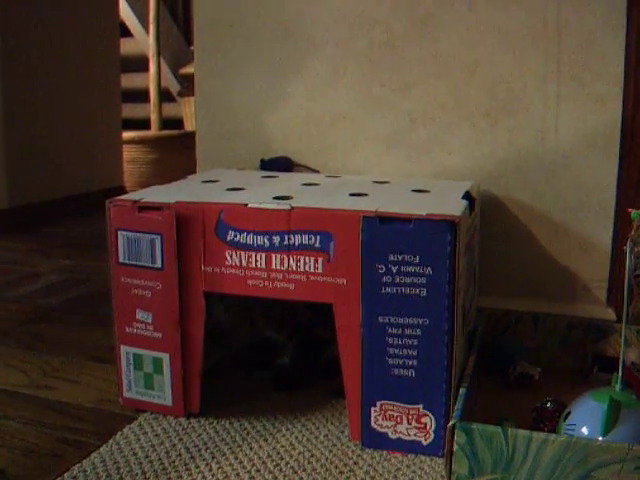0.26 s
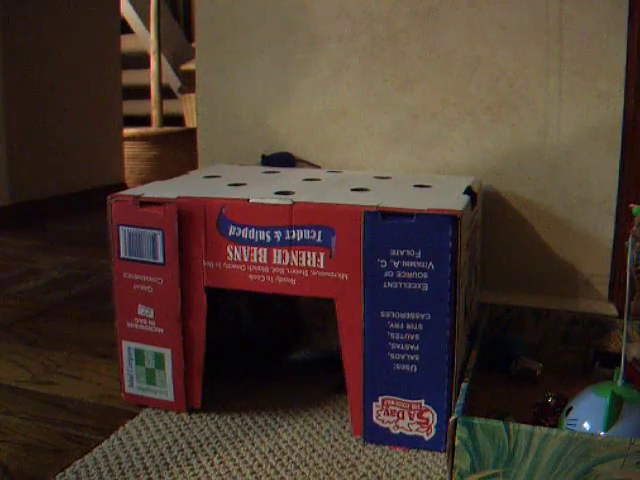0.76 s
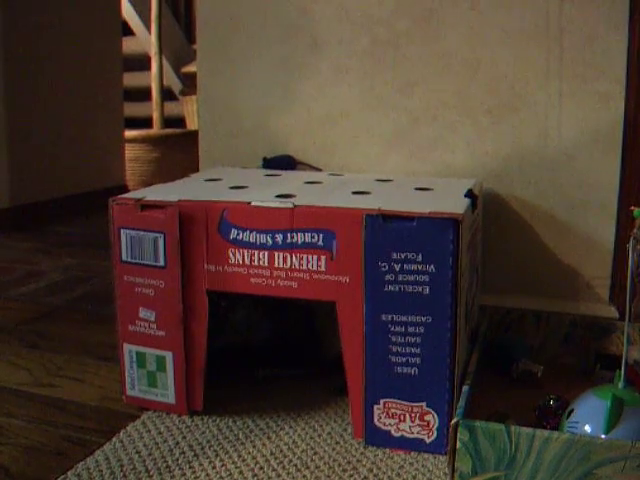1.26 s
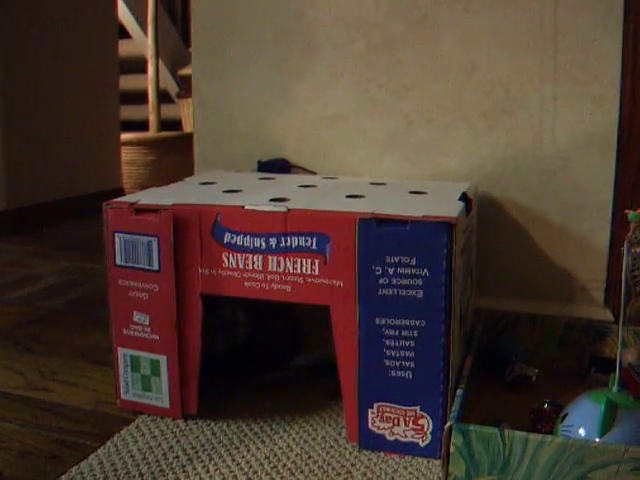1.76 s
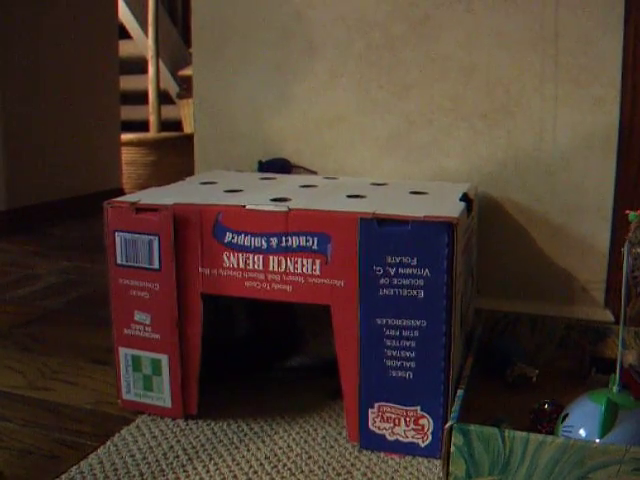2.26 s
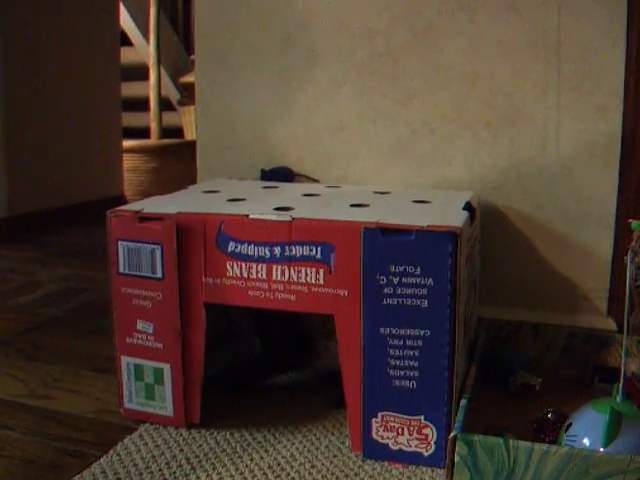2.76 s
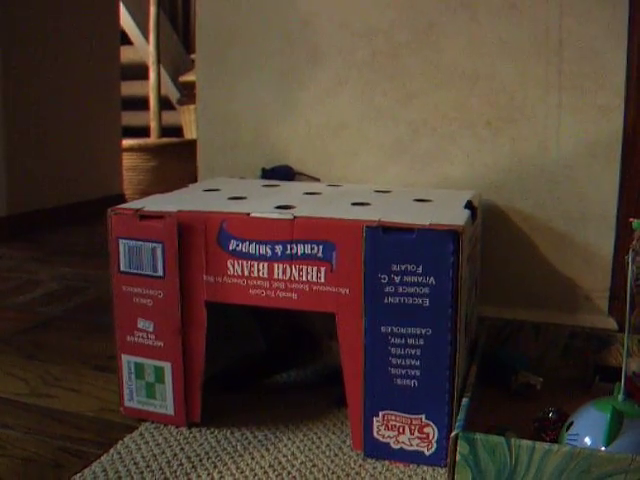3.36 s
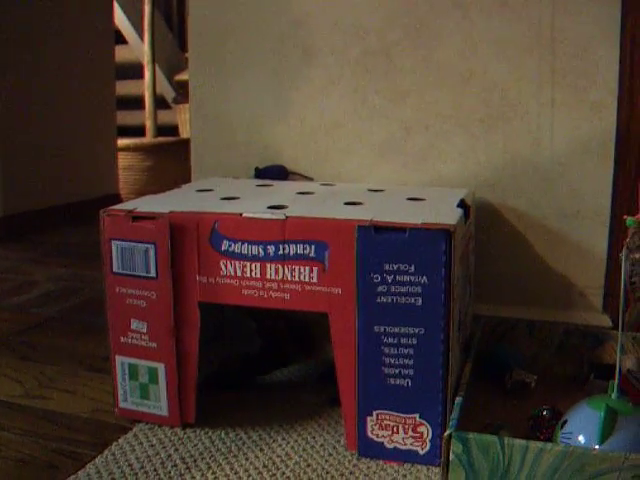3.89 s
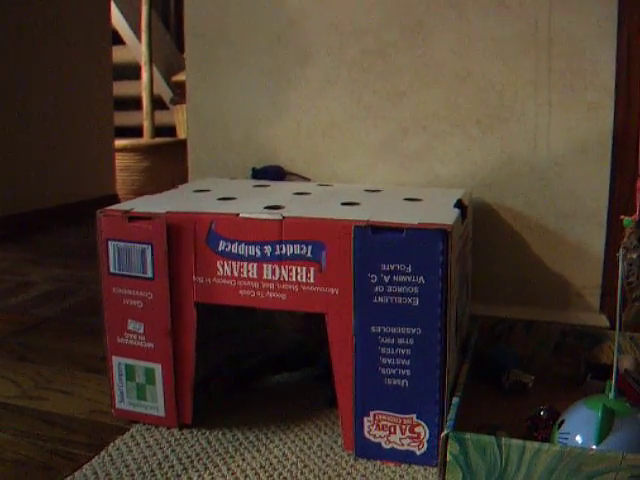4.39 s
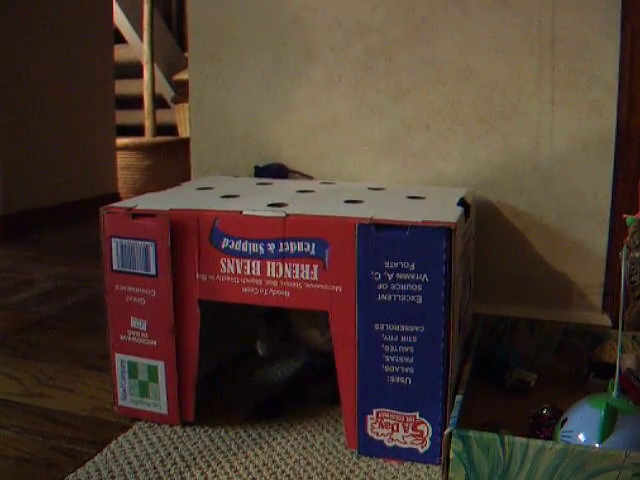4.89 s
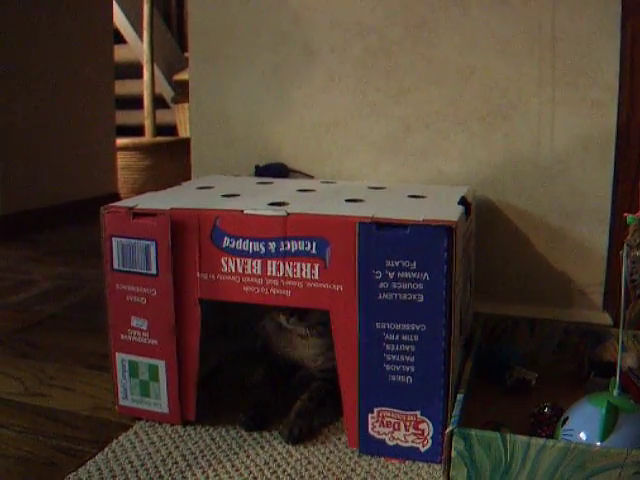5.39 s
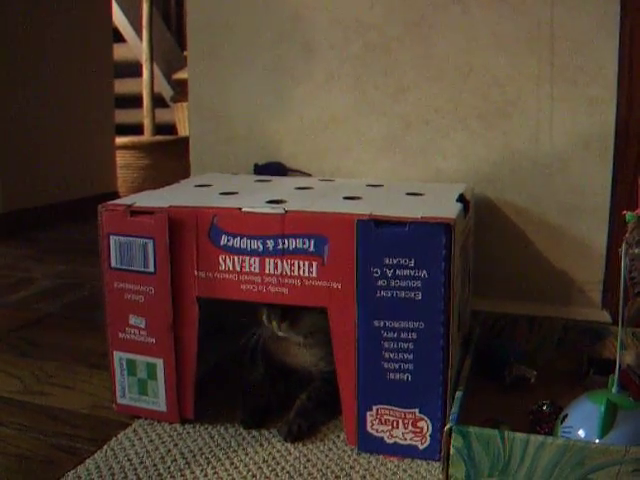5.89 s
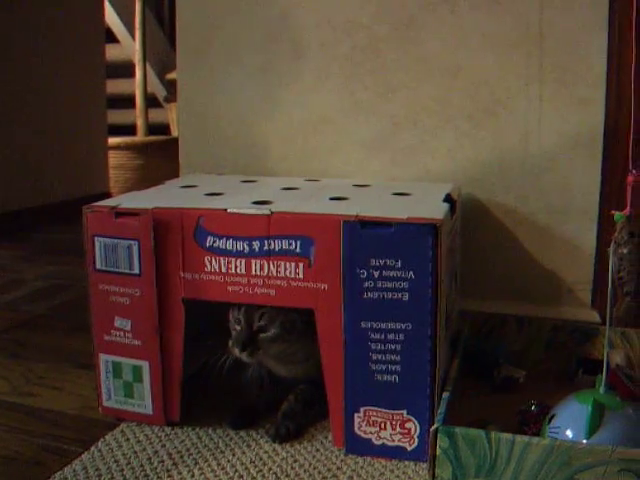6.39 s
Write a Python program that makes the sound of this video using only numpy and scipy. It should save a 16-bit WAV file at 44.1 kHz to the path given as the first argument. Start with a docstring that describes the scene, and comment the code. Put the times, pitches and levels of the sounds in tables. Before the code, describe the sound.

A cat lightly taps and scratches inside a cardboard box, then one sharp click and a few soft paw thumps, over faint hiss.

```python
"""On the floor of a quiet room, a cat shifts about inside a cardboard box.
Its fur brushes the doorway, its claws tap and scrape the card and make it ring,
and its paws thump softly. One sharp click sounds close to the microphone.
Under it all the room rumbles, and the camera hums, hisses and whines faintly."""
import sys
import numpy as np
from scipy import signal
from scipy.fft import rfft, irfft
from scipy.io import wavfile
from scipy.ndimage import map_coordinates

SR = 44100
rng = np.random.default_rng(int(sys.argv[2]) if len(sys.argv) > 2 else 0)


def to_wav(s):
    """Save 16-bit WAV."""
    ch = np.atleast_2d(s).T  # columns
    pcm = np.round(np.clip(ch, -1, 1) * 32767)  # PCM
    wavfile.write(sys.argv[1], SR, pcm.astype(np.int16))


N = 292868
SCENE_TIME = np.arange(N) / SR
T = np.arange(SR // 4) / SR  # seconds within one touch


def amp(db):
    """Turn decibels into a gain."""
    return 10 ** (np.asarray(db) / 20)


def along(points, hz):
    """Read between (frequency, value) points, spaced by pitch."""
    f, v = np.transpose(points)
    return np.interp(np.log(hz + 1), np.log(f + 1), v)


def wobble(rate):
    """A smooth curve through `rate` random points a second."""
    points = rng.standard_normal(int(N * rate / SR) + 4)
    return map_coordinates(points, [SCENE_TIME * rate])


def noise(spectrum):
    """Noise with the given tone colour and an average (rms) size of 1."""
    gain = amp(along(spectrum, np.fft.rfftfreq(N, 1 / SR)))
    x = irfft(rfft(rng.standard_normal(N)) * gain, N)
    return x / np.sqrt(np.mean(x ** 2) + 1e-20)


def add(track, s, sound):
    """Mix a sound in at s seconds."""
    part = track[round(s * SR):][:len(sound)]
    part += sound[:len(part)]


def ring(tones, scatter_db=0):
    """A struck thing rings with several tones; each drops 60 dB in its fade time."""
    return sum(amp(db + scatter_db * rng.standard_normal() - 60 * T / fade) * np.sin(2 * np.pi * hz * T)
               for hz, db, fade in tones)


# tone colours of the rumble and the hiss: f/Hz, relative level/dB
ROOM_RUMBLE = [(5, -21.5), (25, 0.5), (40, -4), (55, -5), (80, 2), (110, -4), (170, -8.5), (260, -5.5),
               (350, -9.5), (450, -7), (600, -8), (850, -10.5), (1300, -23), (2200, -45.5)]
MIC_HISS = [(500, -23), (900, 0.5), (1100, 2), (2000, 1.5), (3500, 0), (6000, 0.5), (7700, 1.5),
            (8300, -8.5), (9000, -22.5)]
# the camera's low tones: f/Hz, level/dB
HUM_TONES = [(120, -68.5), (198, -65.5), (247.3, -60.2), (325, -69)]

def background():
    """The room rumbles, the microphone hisses and the camera hums a little unsteadily."""
    hum = sum(amp(db) * np.sqrt(2) * np.sin(2 * np.pi * hz * SCENE_TIME + .5 * wobble(9.7))
              for hz, db in HUM_TONES)
    return amp(-54) * noise(ROOM_RUMBLE) + amp(-55.5) * noise(MIC_HISS) + hum


# the camera's high tones: f/Hz, level/dB
WHINE_TONES = [(7691.5, -60), (8308, -69.5)]

def whine(frame_hz=29.3035):
    """The camera's electronics sing high tones that start afresh with every frame."""
    frame = SCENE_TIME * frame_hz % 1  # runs from 0 to 1 in each frame
    gate = np.minimum(1, 20 * np.minimum(frame, 1 - frame))
    return gate * sum(amp(db) * np.sqrt(2) * np.sin(2 * np.pi * hz * frame / frame_hz)
                      for hz, db in WHINE_TONES)


# tone colour of fur on card: f/Hz, relative level/dB
FUR_COLOUR = [(60, -3), (150, 2.5), (300, 3.5), (650, 5.5), (1100, -4), (3000, -6), (5500, -2.5),
              (7500, -1), (9000, -25.5)]
# swishes at their firmest touch: t/s, level/dB, swell time/s
FUR_SWISHES = [(.05, -53, .2), (6.02, -52.5, .1), (6.12, -40.5, 0.025), (6.196, -41.5, 0.013),
               (6.31, -53.5, .07)]

def fur(swell_db=10.5):
    """The coat brushes the card in uneven swishes that rise, then fall, by swell_db per swell time."""
    touch = sum(amp(db - swell_db * np.abs(SCENE_TIME - s) / swell) for s, db, swell in FUR_SWISHES)
    return touch * amp(1.2 * wobble(90)) * noise(FUR_COLOUR)


def rasp(force, response, grain_db):
    """Fibres catch and slip unevenly under a claw; each slip sets off the sound `response`."""
    grains = np.interp(T, np.linspace(0, T[-1], num=250), rng.standard_normal(250))
    slips = force * amp(grain_db * grains) * rng.standard_normal(len(T))
    sound = signal.fftconvolve(slips, response)[:len(T)]
    return sound * np.linalg.norm(force) / np.linalg.norm(sound)


# tone colour of the card: f/Hz, relative level/dB
CARD_COLOUR = [(150, -31), (500, -8), (1000, -2), (1500, -2.5), (2600, 3), (3500, 1), (4500, 0),
               (7300, 1.5), (9000, -19)]

def fibre_snap(bright_db):
    """One fibre of the card snaps; a sharper claw makes it brighter."""
    hz = np.fft.rfftfreq(len(T), 1 / SR)
    gain = amp(along(CARD_COLOUR, hz) + bright_db * np.log2(hz / 3000 + 0.34))
    # turn that colour into a pulse that starts at once and dies away
    cepstrum = irfft(np.log(gain), len(T))
    return irfft(np.exp(rfft(2 * cepstrum[:len(T) // 2], len(T))), len(T))


# the stiff walls' tones: f/Hz, relative level/dB, fade/s
WALL_TONES = [(1327, -5, 0.048), (1550, -4.5, 0.03), (1700, 1, 0.056), (1840, -11.5, .08), (2100, 3, 0.033),
              (2250, 2.5, 0.02), (2533, 3, 0.025), (2980, 7, 0.02), (3230, -13, 0.022)]

def walls(force, grain_db):
    """Slipping fibres make the walls of the box sing."""
    return rasp(force, ring(WALL_TONES), grain_db)


def spot_ring(hz, fade, overtone=1.88):
    """The touched spot rings at its own pitch and at one weaker, higher tone."""
    return ring([(hz, 0, fade), (hz * overtone, -8.5, fade / overtone)])


# the hollow box's tones: f/Hz, relative level/dB, fade/s
BOX_TONES = [(260, -3.5, 0.061), (330.4, -3, 0.13), (356, -7.5, 0.079), (584, -7, 0.11),
             (647.6, -4.5, 0.18), (694, -8, .16), (799, -8, 0.093), (1158, -11.5, 0.11),
             (1430, -18.5, 0.13)]
# taps: t/s, fade/s, crack level/dB, brightness/(dB per octave), spot f/Hz, hollow level/dB
CLAW_TAPS = [(.602, 0.044, -39, 0.5, 860, -40.5), (.942, .1, -39.5, -1, 704, -35),
             (1.039, .025, -32, -5, 1790, -38), (1.066, .025, -26, -1, 2040, -37),
             (1.207, .03, -45, 3, 2210, -43), (1.222, 0.084, -44.5, 2, 703, -37.5),
             (1.710, 0.026, -28, 1.5, 1940, -46), (1.722, 0.029, -25, 0, 3010, -52),
             (1.934, 0.087, -36, 2, 2760, -40.5), (1.956, 0.079, -42.5, -12, 820, -52),
             (2.011, 0.033, -39.5, -4, 1310, -42), (2.391, 0.066, -36, 2.5, 900, -30),
             (2.890, 0.047, -37.5, -11, 1900, -47), (3.726, 0.073, -34.5, -2.5, 1193, -54),
             (3.731, 0.041, -36.5, -4.5, 766, -56), (4.415, 0.1, -35.5, -5.5, 768, -53),
             (4.424, 0.052, -35, 2, 1420, -55), (4.565, .042, -28.5, -7, 1800, -57),
             (6.146, 0.025, -43, -2, 620, -38), (6.181, 0.039, -42, 10, 474, -34.5),
             (6.195, 0.017, -30, -13.5, 396, -49)]

def taps():
    """Each tap cracks on the surface, rings the struck spot and sounds the hollow of the box."""
    out = np.zeros(N)
    for s, fade, crack_db, bright_db, spot_hz, hollow_db in CLAW_TAPS:
        force = amp(-60 * T / fade)
        crack = rasp(force, fibre_snap(bright_db), grain_db=8.5)
        crack += amp(-6.5) * walls(force, grain_db=0)
        blow = 0.62 * spot_ring(spot_hz, fade)
        chatter = 0.78 * rasp(force, spot_ring(spot_hz, 13 / spot_hz), grain_db=2)
        spot_db = crack_db + 1 - 3 * np.log2(spot_hz / 1000)  # stiffer, higher spots ring less
        hollow = ring(BOX_TONES, scatter_db=1.2) * (1 - np.exp(-T / 0.0031))
        add(out, s, amp(crack_db) * crack + amp(spot_db) * (blow + chatter) + amp(hollow_db) * hollow)
    return out


# scrapes: t/s, length/s, rasp level/dB, brightness/(dB per octave), spot f/Hz, spot level/dB
CLAW_SCRAPES = [(.72, 0.11, -47.5, -7, 2240, -59), (1.131, 0.04, -48, -9.5, 2100, -58),
                (1.746, 0.05, -46, -5, 3020, -57), (1.84, 0.044, -39.5, -4.5, 1360, -43),
                (1.847, 0.032, -42, 0, 2600, -40), (2.016, .03, -43, -4, 690, -45.5),
                (2.034, 0.044, -44, -3, 1430, -43), (2.11, .022, -42.5, 5, 3760, -45),
                (2.879, 0.024, -54, -5, 1980, -44.5), (3.749, 0.1, -46, 4, 1300, -51.5),
                (3.852, .05, -46, 0.5, 3260, -48.5), (3.948, 0.029, -51, 0, 2980, -39.5),
                (3.955, .035, -42.5, -1, 1650, -42.5), (4.565, .055, -47, -2, 2300, -37),
                (4.594, .025, -42, -2, 1780, -35)]

def scrapes(press_share=.3):
    """A dragged claw presses harder for the first part of its stroke, then lets go."""
    out = np.zeros(N)
    low_cut = signal.butter(2, 800, "highpass", fs=SR)  # a light claw cannot move the whole wall
    for s, length, rasp_db, bright_db, spot_hz, spot_db in CLAW_SCRAPES:
        force = np.interp(T, [0, length * press_share, length], [0, 1, 0]) ** 0.42
        scratch = rasp(force, signal.lfilter(*low_cut, fibre_snap(bright_db)), grain_db=3.5)
        scratch += .5 * walls(force, grain_db=1.5)
        spot = rasp(force, spot_ring(spot_hz, 22 / spot_hz), grain_db=2)
        add(out, s, amp(rasp_db) * scratch + amp(spot_db) * spot)
    return out


# soft weight landing on the box floor: t/s, level/dB, f/Hz
PAW_THUMPS = [(1.069, -40.5, 148), (2.391, -30.5, 150), (5.722, -26, 270), (5.883, -21, 242),
              (6.195, -17.5, 302)]

def thumps(fade_cycles=11.7):
    """Padded paws give a round, low thump with no crack; lower ones last longer."""
    out = np.zeros(N)
    for s, db, hz in PAW_THUMPS:
        fade = fade_cycles / hz
        tones = [(hz, 0, fade), (hz * 0.63, -7, fade), (hz * 1.254, -12, fade), (hz * 2.2, -14, fade)]
        add(out, s, amp(db) * ring(tones) * (1 - np.exp(-T / 0.0041)))
    return out


# a small hard part's tones: f/Hz, relative level/dB, fade/s
CLICK_TONES = [(256, -29, 0.04), (590, -18, 0.01), (850, -24, 0.021), (1400, -12.5, 0.0075),
               (2370, -13.5, 0.0093), (3350, -13, 0.0065), (4050, -0.5, 0.0045), (4440, -7, 0.0049),
               (5900, 2.5, 0.003), (7440, -10.5, 0.0056)]

def click():
    """A small hard part snaps once, right beside the microphone."""
    out = np.zeros(N)
    add(out, 5.436, amp(-3) * ring(CLICK_TONES) * (1 - np.exp(-T / 0.00056)))
    return out


# how long the room rings: f/Hz, fade/s
ROOM_FADES = [(150, 0.21), (700, 0.42), (2500, 0.22), (8000, 0.21)]

def room_echo(x, delay_s=.004):
    """The room throws sound back, each pitch dying away at its own speed."""
    hz, t, bands = signal.stft(rng.standard_normal(SR // 2), SR, nperseg=256)
    fading = amp(-60 * t / along(ROOM_FADES, hz)[:, None])
    tail = signal.istft(bands * fading, SR, nperseg=256)[1]
    delayed = np.pad(x, (round(delay_s * SR), 0))
    return signal.fftconvolve(delayed, tail / np.linalg.norm(tail))[:N]


def scene():
    """Mix the cat, its echo and the other sounds into one channel."""
    cat = taps() + scrapes() + thumps() + fur()
    return (cat + amp(-8) * room_echo(cat) + click() + background() + whine())[None]


def record(dry):
    """The camera cuts off the highest treble steeply."""
    top_hz = 8650
    hz = np.fft.rfftfreq(N, 1 / SR)
    return irfft(rfft(dry) / np.sqrt(1 + (hz / top_hz) ** 110), N)


dry = scene()
out = record(dry)
to_wav(out)
```